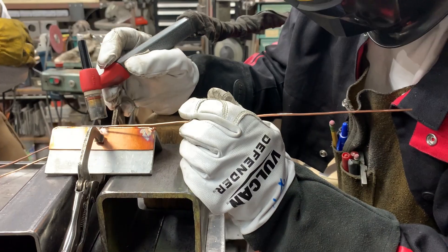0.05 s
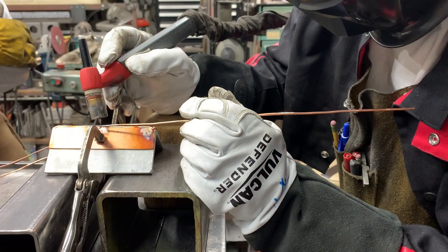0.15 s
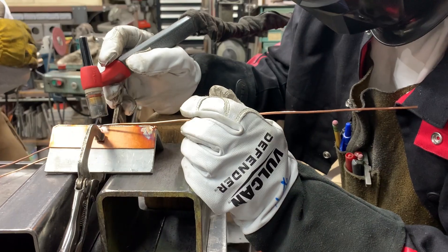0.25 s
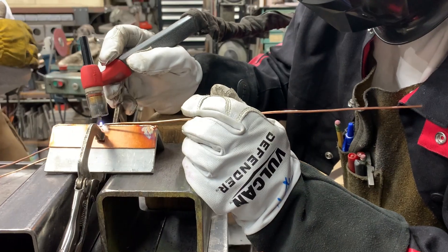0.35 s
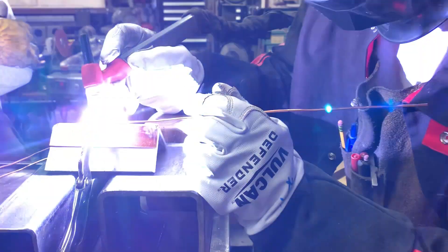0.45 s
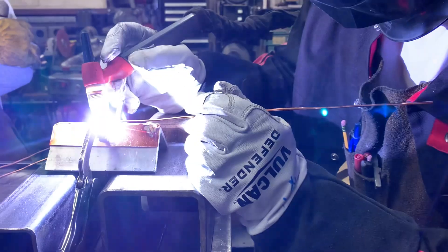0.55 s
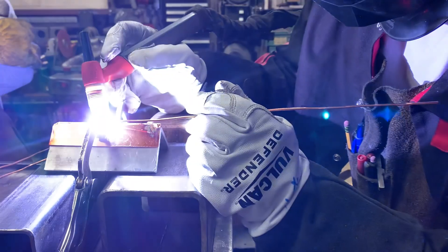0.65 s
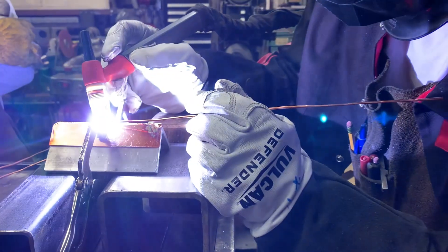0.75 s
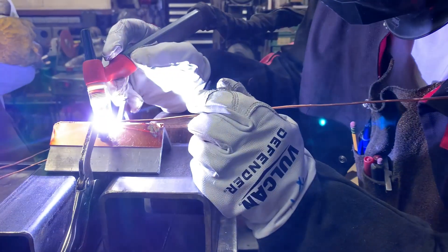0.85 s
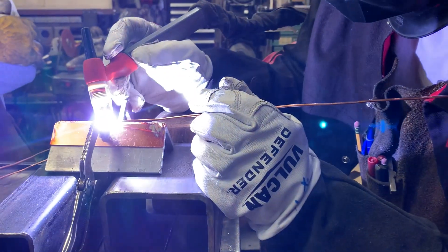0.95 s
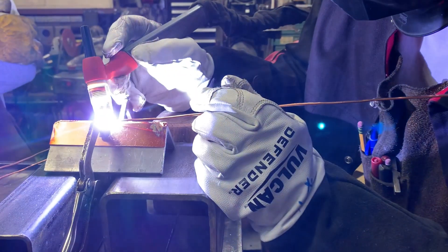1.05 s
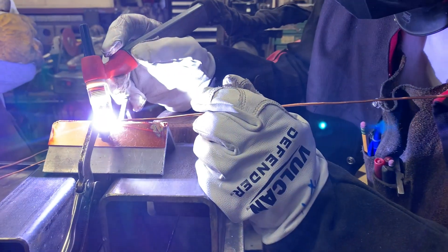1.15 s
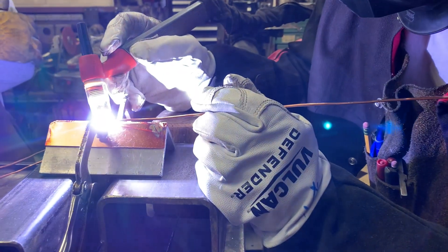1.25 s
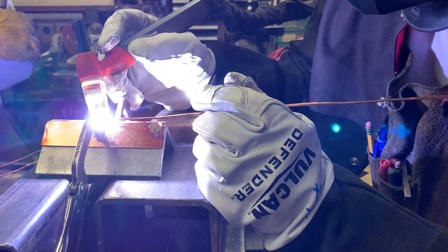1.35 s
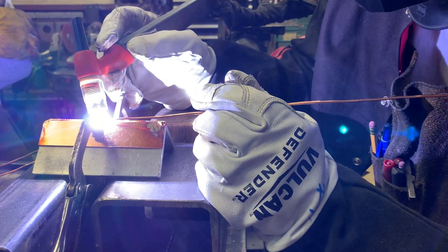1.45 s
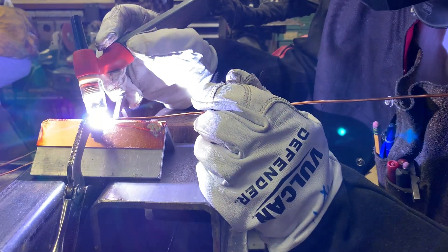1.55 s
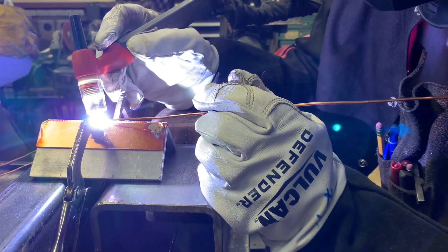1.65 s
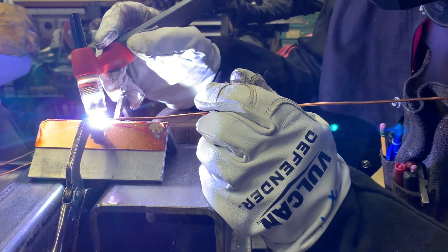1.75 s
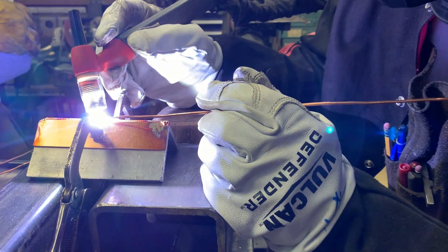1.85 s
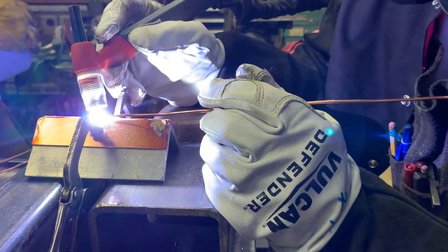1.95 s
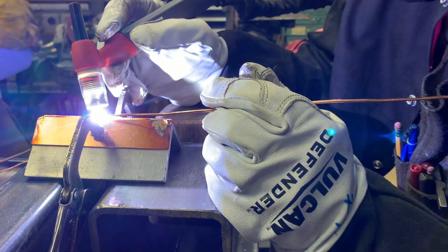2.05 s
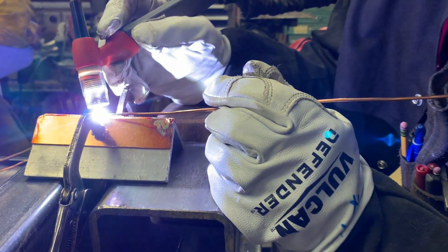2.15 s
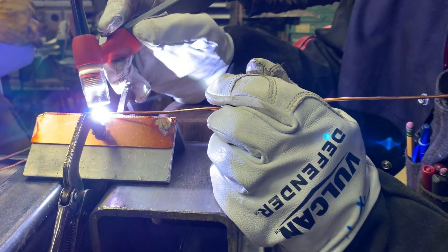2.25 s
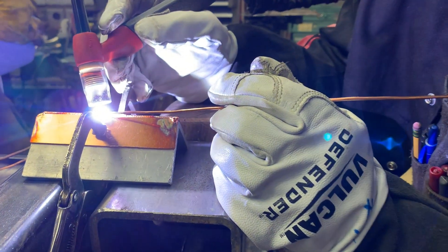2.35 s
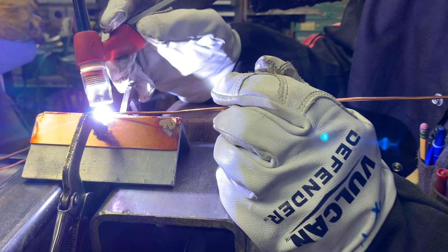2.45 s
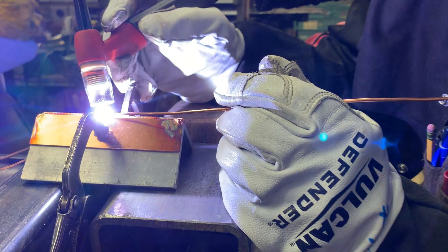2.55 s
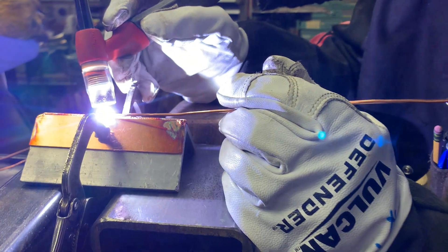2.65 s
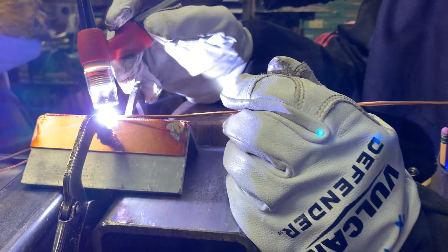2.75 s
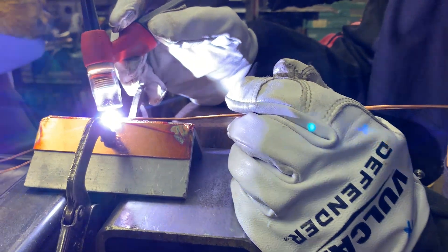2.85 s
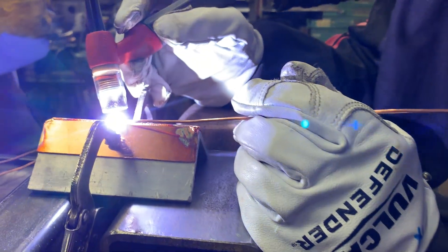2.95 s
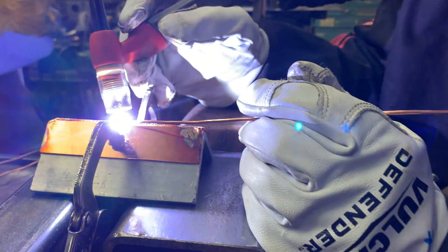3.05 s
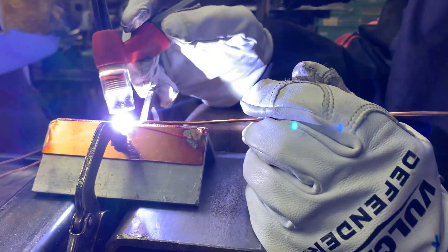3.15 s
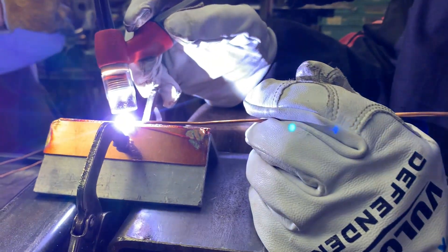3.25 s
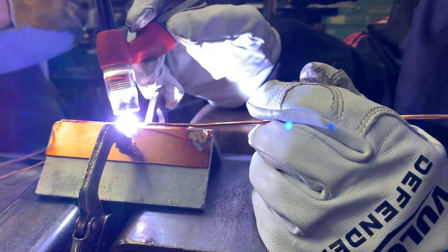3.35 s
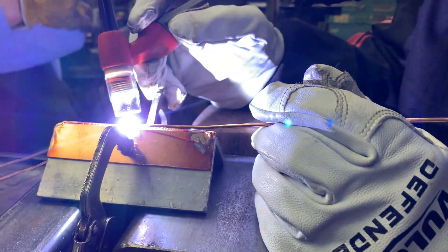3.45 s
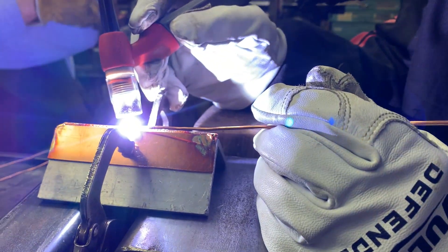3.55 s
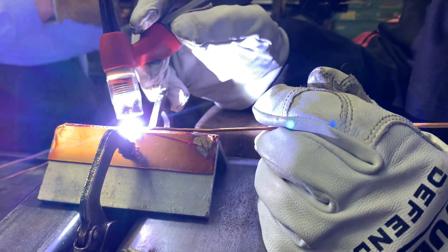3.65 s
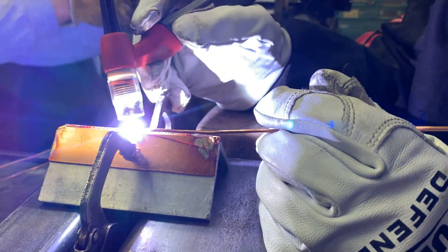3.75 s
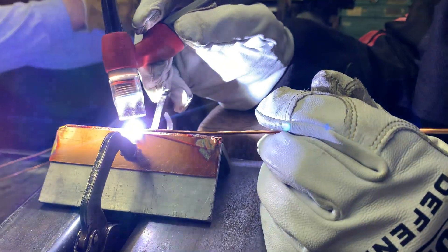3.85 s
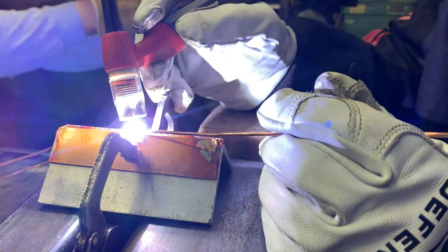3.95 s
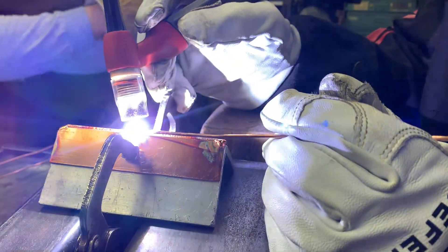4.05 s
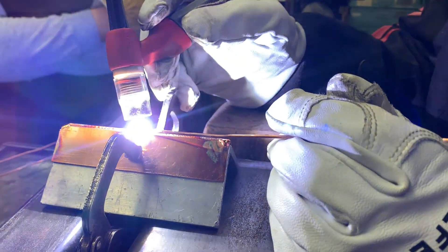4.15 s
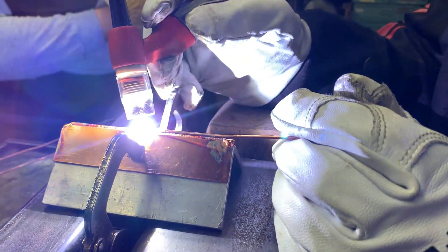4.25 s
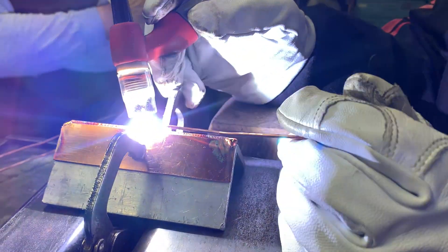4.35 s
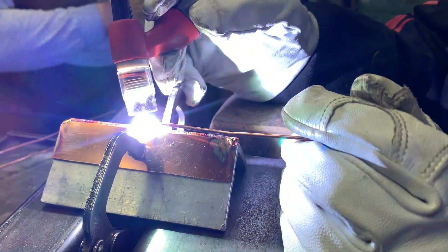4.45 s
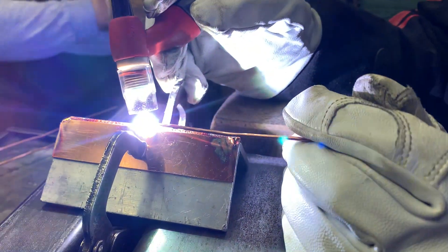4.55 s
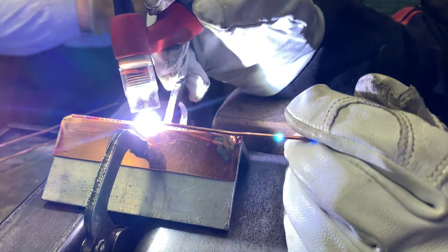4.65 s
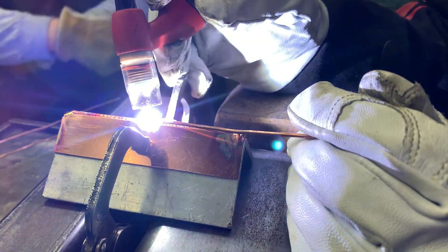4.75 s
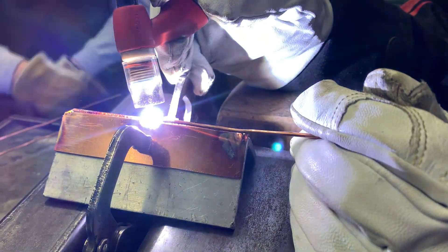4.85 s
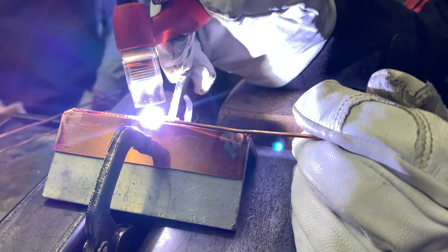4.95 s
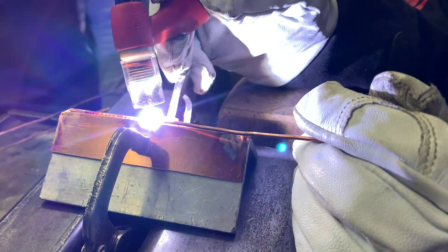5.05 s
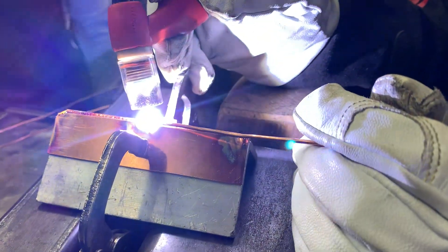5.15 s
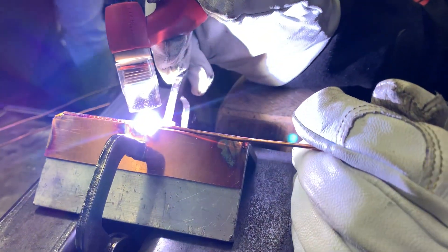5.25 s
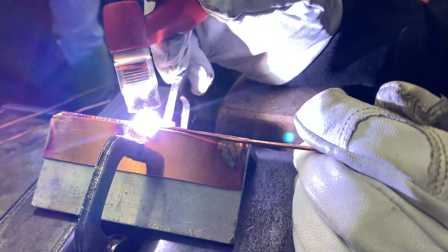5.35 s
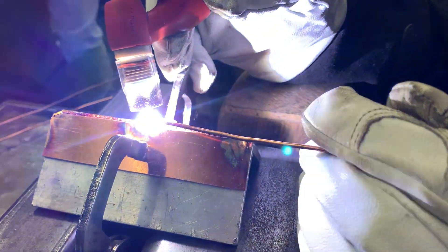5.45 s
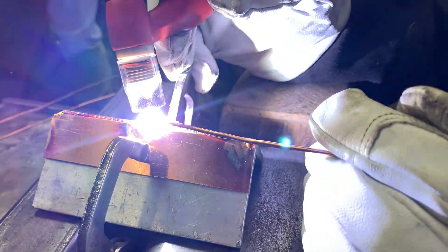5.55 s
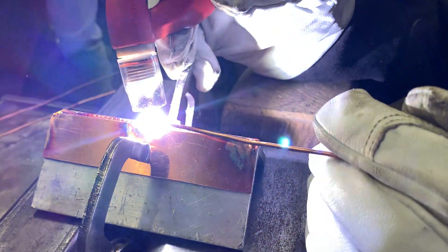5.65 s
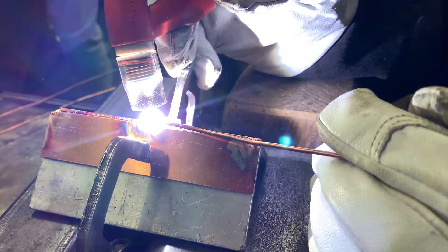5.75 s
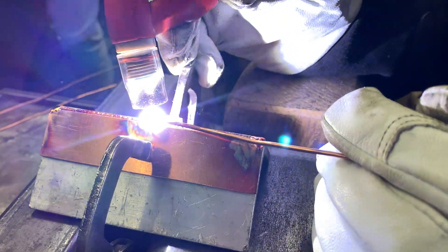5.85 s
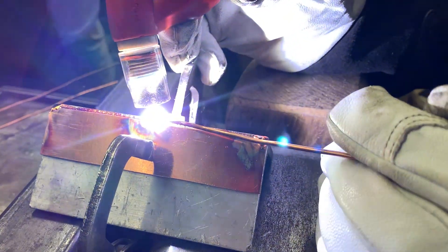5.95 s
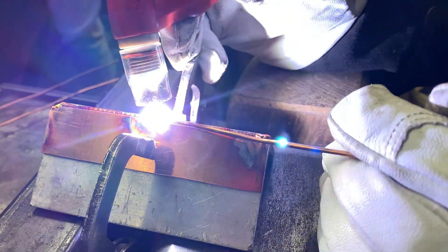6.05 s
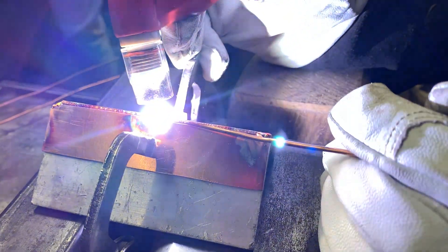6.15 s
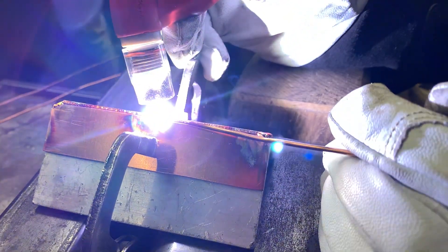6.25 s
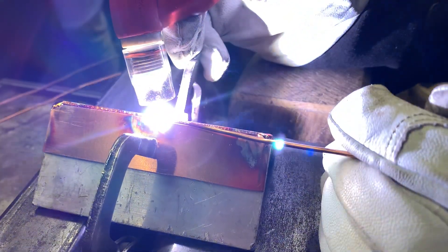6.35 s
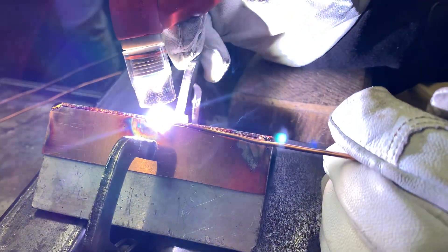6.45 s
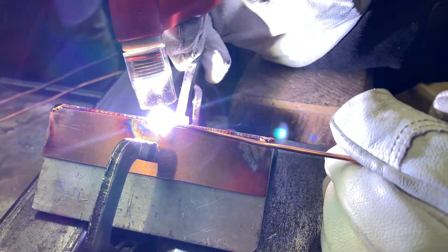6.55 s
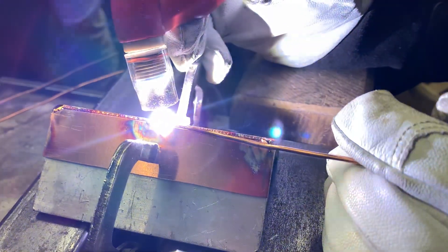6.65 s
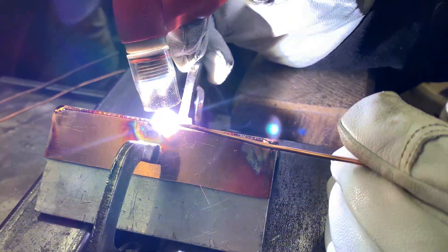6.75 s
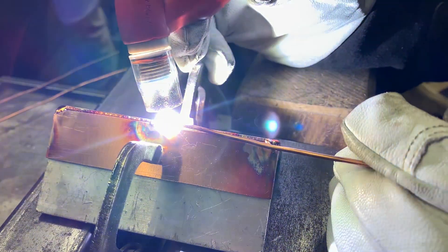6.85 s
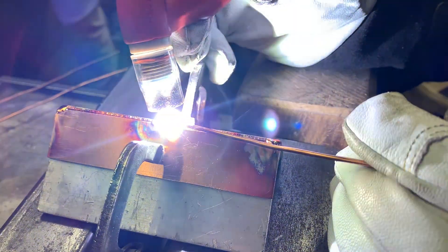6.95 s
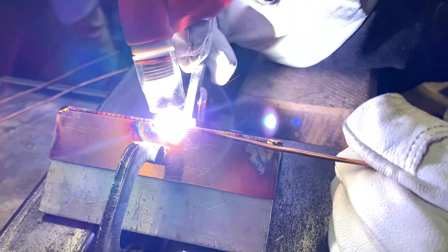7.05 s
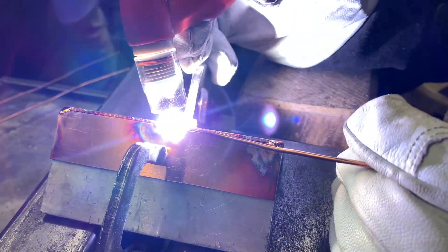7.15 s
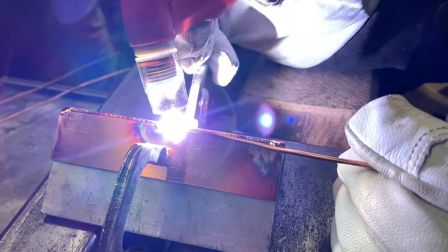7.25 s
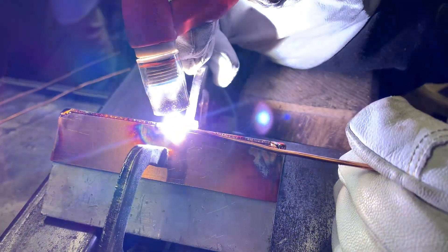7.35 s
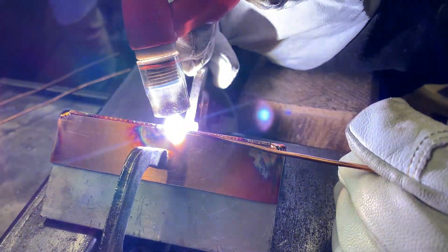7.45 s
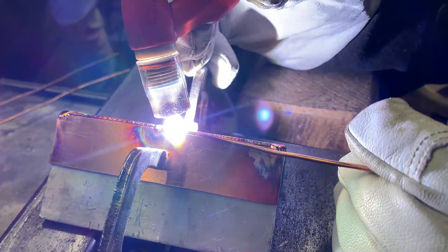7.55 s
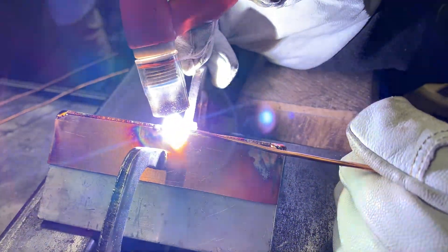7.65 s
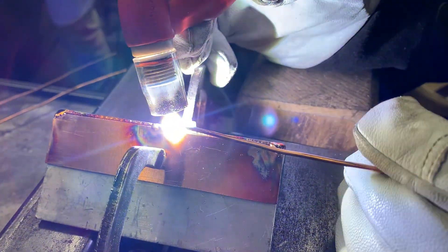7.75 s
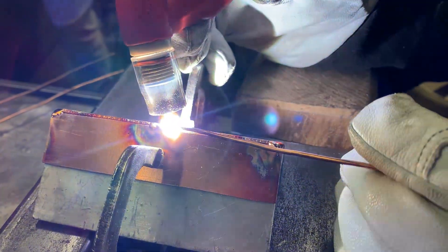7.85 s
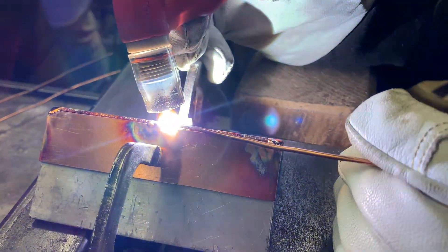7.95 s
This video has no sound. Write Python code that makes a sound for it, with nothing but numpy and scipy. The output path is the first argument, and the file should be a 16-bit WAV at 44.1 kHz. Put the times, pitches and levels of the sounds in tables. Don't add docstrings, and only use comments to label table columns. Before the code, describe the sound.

In a workshop with a humming transformer and droning fan, a small switch click and valve tick release a sharp gas rush. A hard snap begins a tenth of a second of buzzing spark crackle, then the welding arc catches and burns continuously with bright, airy hiss and an even electrical buzz. The close stereo microphone moves nearer, and soft low handling bumps appear later.

```python
import sys
import numpy as np
from scipy import signal
from scipy.fft import rfft, irfft
from scipy.io import wavfile
from scipy.ndimage import map_coordinates

SR = 44100
rng = np.random.default_rng(int(sys.argv[2]) if len(sys.argv) > 2 else 0)


def store_wav(level_fs):
    pcm = np.round(np.clip(np.atleast_2d(level_fs), -1, 1) * 32767)
    wavfile.write(sys.argv[1], SR, pcm.T.astype(np.int16))


def volts(x):
    e = np.asarray(x, float) / 20
    return 10 ** e


N = 352800
TIME = np.arange(N) / SR
HZ = np.arange(N // 2 + 1) * SR / N + 1e-3

MAINS_RIPPLE_HZ = 119.93
FIRST_SPARK_S, ARC_LIT_S = .3166, .413

# time in seconds, level in dB.
FLOW = [(.42, -2.5), (.46, -4), (.5, -5), (.65, 3.5), (.8, 4), (1.0, 1.5), (1.5, -3.5), (2.0, -1),
        (2.5, -2.5), (3.0, -1.5), (3.5, -.5), (4.25, 3), (5.0, 3), (5.75, 5.5), (6.5, 5.5), (7.0, 6.5),
        (7.75, 7.5), (8.0, 5)]


def rms_one(x):
    return x / np.sqrt(np.mean(x ** 2) + 1e-20)


def in_time(rows):
    s, *columns = np.transpose(rows)
    return [np.interp(TIME, s, c) for c in columns]


def at_hz(points, hz=HZ):
    at, values = np.transpose(points)
    return np.interp(np.log(hz), np.log(at), values)


def shaped(x, gain):
    return irfft(rfft(x) * gain, N)


def drift(rate):
    knots = rng.standard_normal(int(N / SR * rate) + 2)
    coarse = TIME[::128]
    return np.interp(TIME, coarse, map_coordinates(knots, [coarse * rate], order=3))


def bump(middle, half):
    return np.exp(-((TIME - middle) / half) ** 2)


def tone(hz, db, wander_db, rate, lead=0, pan_db=0, scatter=1):
    sides = np.array([[.5], [-.5]])
    phase = 2 * np.pi * (hz * TIME + scatter * rng.random()) - lead * sides
    level_db = db + pan_db * sides + wander_db * np.array([drift(rate), drift(rate)])
    return np.sqrt(2) * volts(level_db) * np.sin(phase)


def approach():
    return 1.08 * np.maximum(TIME - 2.52, 0)


def transformer(gain_db):
    idle = TIME < FIRST_SPARK_S
    inrush = ~idle * np.exp(-np.maximum(TIME - FIRST_SPARK_S, 0) / .055)
    ripple_db = -47.5 + gain_db + approach() + 5 * idle + 20.5 * inrush
    octave_db = -53 + gain_db + 1.66 * approach() - 6 * idle + 5 * bump(1.2, .33)
    hum = tone(MAINS_RIPPLE_HZ, ripple_db, .96, 3.69, lead=.1, pan_db=-1)
    return hum + tone(2 * MAINS_RIPPLE_HZ, octave_db, .32, 2.53)


def fan(level_db):
    turn_hz = 58.67
    # multiple of the turning rate, level in dB rms.
    fan_orders = [(1, -69.5), (4, -55), (5, -72.5), (6, -66.5), (7, -83), (8, -71), (10, -69.5),
                  (12, -69.5), (13, -82), (14, -69), (16, -78)]
    return sum(tone(k * turn_hz, db + level_db + 46.5, 1.8, 1.71) for k, db in fan_orders)


def room_air(level_db):
    # frequency in Hz, density in dB per Hz.
    air_spectrum = [(21, -46), (35, -28), (107, -7), (365, -10), (437, -15.5), (805, -15.5), (987, -18.5),
                    (1340, -20), (1480, -21), (1870, -22.5), (5180, -35.5), (8620, -57), (15500, -70)]
    # frequency in Hz, width in Hz, height in dB.
    fan_hollows = [(187.7, 19.4, 9), (437, 13, 10), (609, 13.6, 9.5)]
    # frequency in Hz, likeness from 0 to 1.
    likeness = [(40, 1), (130, 0.65), (300, 0.56), (600, 0.01), (1200, 0), (16000, 0)]
    # time in seconds, half length in seconds, swell in dB.
    bumps = [
        (.36, .08, 16),
        (3.96, .1, 10),
        (5.065, 0.052, 16),
        (5.62, 0.09, 21),
        (5.884, .2, 26),
        (6.9, 0.81, 12),
    ]
    alike = np.clip(at_hz(likeness), 0, 1)
    mid, side = rfft(rng.standard_normal((2, N)))
    pair = np.sqrt(1 + alike) * mid + np.sqrt(1 - alike) * side * [[1], [-1]]
    resonance_db = sum(db / (1 + (2 * (HZ - hz) / width) ** 2) for hz, width, db in fan_hollows)
    air = rms_one(irfft(pair * volts(at_hz(air_spectrum) + resonance_db) * (HZ > 56), N))
    rumble = rms_one(irfft(pair * (HZ <= 56) / (1 + (40 / HZ) ** 12), N))
    rumble_db = -74.5 + 3.5 * drift(7) + sum(db * bump(s, half) for s, half, db in bumps)
    return air * volts(level_db - .8) + rumble * volts(rumble_db)


def shop():
    # time in seconds, gain in dB.
    gain_points = [
        (0, -0.5),
        (.3, -4.5),
        (.41, -4.5),
        (.46, -15.5),
        (.6, -2.5),
        (.9, 0),
        (8, -1.5),
    ]
    gain_db, = in_time(gain_points)
    level_db = -43.5 + .35 * gain_db + .66 * approach() + 7 * bump(.2, .1) + 1.6 * drift(6.5)
    return transformer(gain_db) + fan(level_db) + room_air(level_db)


def clicks():
    # start in seconds, peak in dB, pitch in Hz, decay by 60 dB in seconds.
    impacts = [
        (.0977, -44, 4800, .03),
        (.1416, -28, 2000, .004),
        (.1424, -29, 420, .02),
        (.232, -36, 500, .02),
        (.368, -33, 450, .03),
        (.398, -35, 560, .025),
    ]
    out = np.zeros(N)
    for s, db, hz, t60 in impacts:
        age = np.maximum(TIME - s, 0)
        ring = np.sin(2 * np.pi * hz * age) + .27 * rng.standard_normal(N)
        burst = ring * volts(-60 * age / t60) * (TIME >= s)
        out += volts(db) * signal.lfilter(*signal.butter(1, min(4 * hz, 15000), fs=SR), burst)
    return out


def sparks():
    # frequency in Hz, density in dB per Hz.
    spark_spectrum = [(1000, -24), (2300, -7), (3000, -9), (4000, -32), (4500, -4), (5000, -14), (5700, -7),
                      (6500, -6), (7600, -0.5), (8400, -12), (10300, -1), (11500, -0.5), (13500, 2),
                      (15500, 2)]
    cycles = (TIME - FIRST_SPARK_S) * MAINS_RIPPLE_HZ
    on = (cycles >= 0) & (TIME < ARC_LIT_S)
    rise = np.clip((cycles % 1) / .045, 0, 1)
    fall = np.clip((1 - cycles % 1) / .42, 0, 1)
    snap_rate = 14000
    snaps = (rng.random(N) < snap_rate / SR) * volts(2 * rng.exponential(1, N)) * rng.choice([-1, 1], N)
    snaps[round(FIRST_SPARK_S * SR) + 2] = 5
    bursts = np.arange(12)
    burst_db = np.where(bursts < 3, -10, -16 + 1.3 * rng.standard_normal(len(bursts)))
    burst_db[-1] = -19
    level = volts(burst_db)[np.clip(cycles.astype(int), 0, len(bursts) - 1)]
    level = level * np.maximum(rise * fall, np.abs(cycles) < .02) * on
    colour = volts(at_hz(spark_spectrum))
    return shaped(snaps * level, colour / np.sqrt(np.mean(colour ** 2))) * volts(1.5)


def buzz():
    # multiple of the ripple, level in dB rms, lead of the right port
    # in radians, left-right balance in dB.
    buzz_orders = [(3, -58, -0.1, 2), (4, -54, -0.1, 2), (5, -61, 1.8, 0), (6, -58, -0.5, 5),
                   (7, -63, 0.4, -1), (8, -56, -1.5, 4), (9, -60, -0.4, 4), (10, -53, -2.4, 6),
                   (11, -61, 2.5, -1), (12, -60, 2.0, 0), (13, -62, 1.8, 1), (14, -56, -1.9, 2),
                   (15, -63, -2.8, 2), (16, -60, 3.0, 4), (17, -65, -2.3, 5), (18, -68, -3.1, -1),
                   (19, -68, 2.9, 0), (20, -71, -2.9, 2), (21, -69, 2.8, 0), (22, -69, 3.1, 0),
                   (23, -68, 3.1, 0), (24, -67, 2.7, -1), (25, -65, 2.8, -1)]
    # multiple of the ripple, middle in seconds,
    # half length in seconds, change in dB.
    swells = [(4, 1.34, 0.74, 9.5), (4, 4.23, 0.72, 6.5), (4, 5.55, 1.6, -5.5), (6, 1.4, 0.3, 8),
              (8, 1.36, 0.54, 8.5), (8, 2.7, 1.1, -3.5), (5, 0.72, 0.54, 5), (7, 1.8, 1.2, 3.5),
              (9, 3.6, 1.6, -2.5), (11, 2.7, .5, 11), (12, 3.86, 1.1, 8), (12, 5.8, 1.1, -15),
              (12, 1, .8, -5), (13, 5, 0.49, 7), (15, 1.4, 1, 17), (16, 2.9, 0.63, 0), (10, 0.89, 1.2, -14),
              (10, 6.9, 3.3, 3.5), (14, 3.68, 1.96, 8.5), (14, 7.6, 2.2, -11)]
    common = -3 + .59 * in_time(FLOW)[0]
    change = {}
    for k, middle, half, db in swells:
        change[round(k)] = change.get(round(k), common) + db * bump(middle, half)
    out = 0
    for k, db, lead, pan_db in buzz_orders:
        wander_db = 1 if k in change else 2.2
        line_db = db + change.get(round(k), common)
        out = out + tone(k * MAINS_RIPPLE_HZ, line_db, wander_db, 1.066, lead, pan_db, scatter=.3)
    return out * np.clip((TIME - .5) / .062, 0, 1)


def gas_levels():
    # full level in dB, how far below it starts in dB,
    # sag while the sparks fire in dB.
    rush_bands = [
        (-27, 30, -19),
        (-34.5, 20, -4),
        (-22.5, 23, -5.5),
        (-20, 30, -4),
    ]
    # level in dB, share of the flow's swing, starting surge in dB,
    # gain as the microphone leans in in dB, start of that lean in seconds.
    jet_bands = [
        (-43.5, 0.67, 1, 4, 5.28),
        (-44.5, .6, -2.5, 5, 6.15),
        (-35, 1.02, -2, -0.64, 5.4),
        (-37.5, 0.36, 8, 3.5, 5.8),
    ]
    pedal_s, valve_s, ease_from_s = .097, .14, .26
    flow_db, = in_time(FLOW)
    closed = np.exp(-np.maximum(TIME - valve_s, 0) / .034)
    seep_db, leak_db = -31, -12
    valve_db = np.where(TIME < pedal_s, seep_db, leak_db) * (TIME < valve_s)
    sparking = np.clip((TIME - FIRST_SPARK_S) / (ARC_LIT_S - FIRST_SPARK_S), 0, 1)
    sparking = sparking ** .37
    eased_db = -45 * np.clip(TIME - ease_from_s, 0, FIRST_SPARK_S - ease_from_s)
    surge = np.exp(-(np.maximum(TIME - ARC_LIT_S, 0) / .69) ** 2)
    levels = []
    for (full_db, below_db, sag_db), jet_band in zip(rush_bands, jet_bands):
        jet_db, share, surge_db, lean_db, lean_from_s = jet_band
        lean = np.clip(TIME - lean_from_s, 0, 1)
        before_db = full_db - below_db * closed + valve_db + eased_db + sag_db * sparking
        after_db = jet_db + share * flow_db + surge_db * surge + lean_db * lean
        levels.append(np.where(TIME < ARC_LIT_S, before_db, after_db))
    return levels


def gas():
    # frequency in Hz, density in dB per Hz.
    rush_spectrum = [(1000, -8.5), (2300, -6), (3000, -3.5), (4000, -11), (4500, -6), (5000, -19),
                     (5700, -18), (6500, -12), (7600, -21), (8400, 3), (10300, 2), (11500, 1), (13500, -6),
                     (15500, -4)]
    # frequency in Hz, density in dB per Hz.
    jet_spectrum = [(1000, -19), (2300, -10), (3000, -2.5), (4000, -4), (4500, -3), (5000, -14),
                    (5700, -11), (6500, -7), (7600, -6.5), (8400, -3.5), (10300, 0.5), (11500, -4.5),
                    (13500, -7), (15500, -3)]
    band_edges_hz = (5000, 8000, 12500)
    white = rng.standard_normal(N)
    thin_bass = 1 / np.sqrt(1 + (1500 / HZ) ** 6)
    crossings = [np.clip(.5 + 6 * np.log2(HZ / edge), 0, 1) for edge in band_edges_hz]
    shares = -np.diff([HZ * 0 + 1, *crossings, HZ * 0], axis=0)
    out = 0
    for share, level_db in zip(shares, gas_levels()):
        rush = rms_one(shaped(white, np.sqrt(share) * volts(at_hz(rush_spectrum)) * thin_bass))
        jet = rms_one(shaped(white, np.sqrt(share) * volts(at_hz(jet_spectrum)) * thin_bass))
        turbulence_db = .27 * drift(25) + .96 * drift(5)
        out = out + np.where(TIME < ARC_LIT_S, rush, jet) * volts(level_db + turbulence_db)
    return out * (1 + .034 * np.sin(2 * np.pi * MAINS_RIPPLE_HZ * TIME) * (TIME > ARC_LIT_S))


def cancellations(hz, s):
    # start in seconds, end in seconds, centre in Hz, depth in dB.
    still_notches = [(.1, .45, 5180, -18), (.1, .3, 7150, -16), (.1, 1.1, 11800, -7), (.1, 1.7, 2280, -12),
                     (.33, .43, 3650, -10), (.5, 1.9, 5300, -10), (.4, 1.4, 7750, -8), (1, 1.5, 6050, -14),
                     (1, 1.6, 2620, -9), (1.6, 2.8, 3450, -10), (1.7, 3, 2320, -10), (4.2, 8.3, 4980, -17),
                     (4.4, 6, 7780, -11), (5, 8.3, 2450, -9), (5.2, 8.3, 3350, -6), (5.2, 6.8, 13750, -8),
                     (5.5, 8, 9800, -6), (6, 8, 7450, -8), (6, 8.3, 4640, -13), (2.1, 2.9, 5450, -14)]
    # start in seconds, end in seconds, first centre in Hz,
    # depth in dB.
    sliding_notches = [(1.2, 3.8, 7050, -15), (4, 5.7, 6150, -18), (1.1, 3.1, 11750, -12),
                       (1.4, 2.7, 9000, -5), (2, 3.7, 5330, -22), (2.2, 3.8, 15300, -12),
                       (2.8, 3.9, 13700, -8), (2.9, 4.7, 7650, -13), (3.4, 4.6, 11500, -7)]
    # time in seconds, delay in milliseconds.
    bench_echo = [(0, .85), (2, .92), (3.5, 1.02), (5.4, 1.08), (8, 1.25)]
    db = 0
    for rows, sink in ((still_notches, 0), (sliding_notches, .042)):
        for start, end, from_hz, depth_db in rows:
            centre = from_hz * np.exp(-sink * np.clip(s - start, 0, end - start))
            fade = np.clip(np.minimum(s - start, end - s) / .38 + .5, 0, 1)
            flicker = 1 + .35 * np.interp(s, TIME, drift(5))
            width = 170 + .011 * from_hz
            db = db + depth_db * fade * flicker / (1 + (2 * (hz - centre) / width) ** 2)
    delay = np.interp(s, *np.transpose(bench_echo)) / 1000
    echo = volts(-14) * np.exp(-2j * np.pi * hz * delay)
    return volts(db) * (1 + echo)


def ports(x, twin):
    # time in seconds, shift near 3 kHz in Hz,
    # shift near 8 kHz in Hz.
    aim = [(0, -480, 250), (1, -300, 330), (1.5, -240, 480), (2.1, 50, 500), (2.6, 200, 420),
           (3, 300, -100), (3.8, 120, -200), (4.3, 60, -50), (5.3, 20, 0), (6, -130, 50), (8, 0, 80)]
    # frequency in Hz, lead of the right port in radians, likeness of the torch sound
    # from 0 to 1, left-right balance in dB.
    port_pattern = [(700, 1, 0.5, 2), (1290, -3.3, 0.8, 1), (1860, -2.8, 0.85, 1), (2500, -2.75, .82, 0),
                    (2800, -3.14, .93, 0), (3100, -3.7, .8, 0), (3550, -4.6, 0.65, -2),
                    (4020, -6.3, 0.97, -2), (5340, -6, 0.5, -7), (6570, -6, 0.88, -1.5),
                    (7350, -4.5, 0.85, 1), (8540, -3, 0.98, 0), (11430, 0.5, 0.99, 0),
                    (13500, 3.14, .99, 0), (16040, 6.9, .99, 0)]
    hz, s, (same, other) = signal.stft([x, twin], SR, nperseg=512, noverlap=384)
    hz = hz[:, None]
    when, low_shift, high_shift = np.transpose(aim)
    near = lambda centre, width: np.exp(-((hz - centre) / width) ** 2)
    seen = hz - np.interp(s, when, low_shift) * near(2800, 1400)
    seen = seen - np.interp(s, when, high_shift) * near(8200, 1000)
    at, *columns = np.transpose(port_pattern)
    lead, alike, pan_db = [np.interp(seen, at, c) for c in columns]
    alike = np.clip(alike, 0, 1)
    turn = np.exp(.5j * lead) * volts(-pan_db / 2)
    same = same * np.sqrt((1 + alike) / 2)
    other = other * np.sqrt((1 - alike) / 2)
    pair = np.array([(same + other) / turn, (same - other) * turn]) * cancellations(hz, s)
    return signal.istft(pair, SR, nperseg=512, noverlap=384)[1][:, :N]


def scene():
    crackle = sparks()
    torch = ports(gas() + crackle, gas() + np.roll(crackle, 31))
    return torch + buzz() + shop() + clicks()


def low_pass(x):
    return signal.sosfilt(signal.butter(12, 17110, fs=SR, output="sos"), x)


def record(dry):
    top = np.clip((15830 - HZ) / 80, 0, 1)
    return low_pass(shaped(dry, top))


dry = scene()
out = record(dry)
store_wav(out)
```